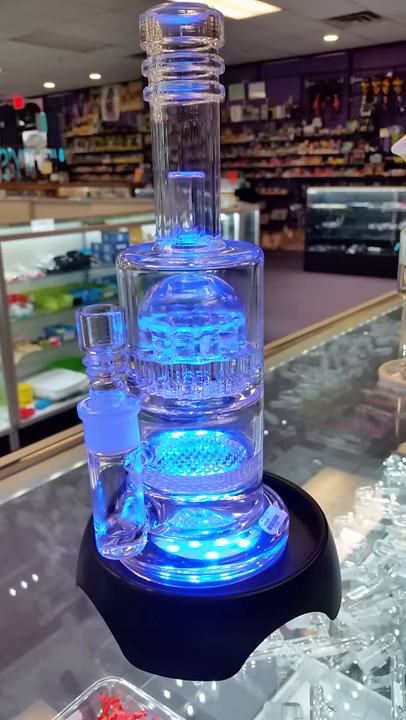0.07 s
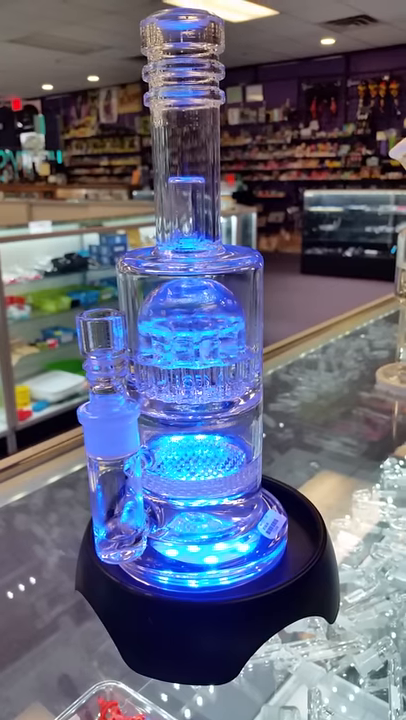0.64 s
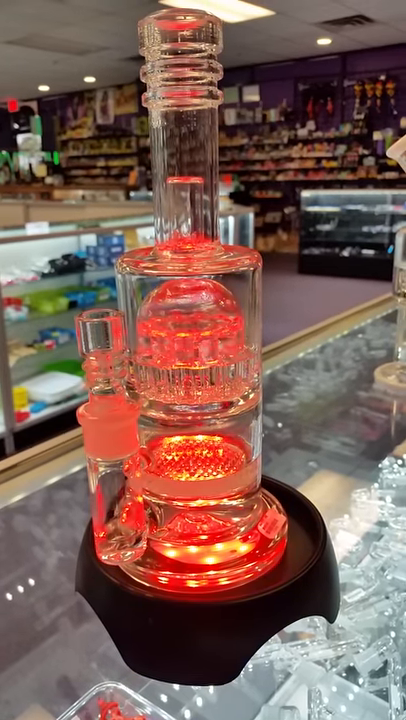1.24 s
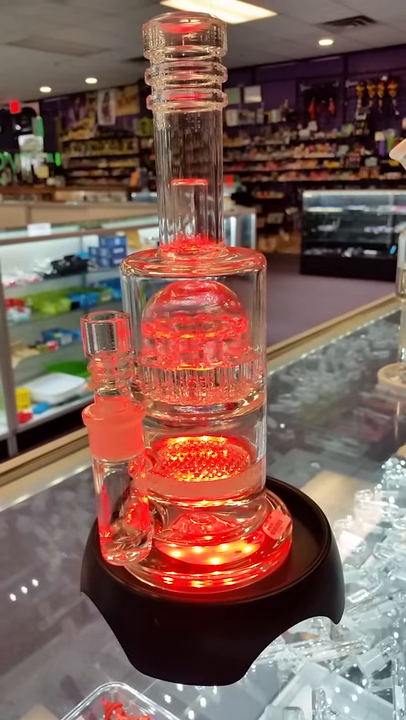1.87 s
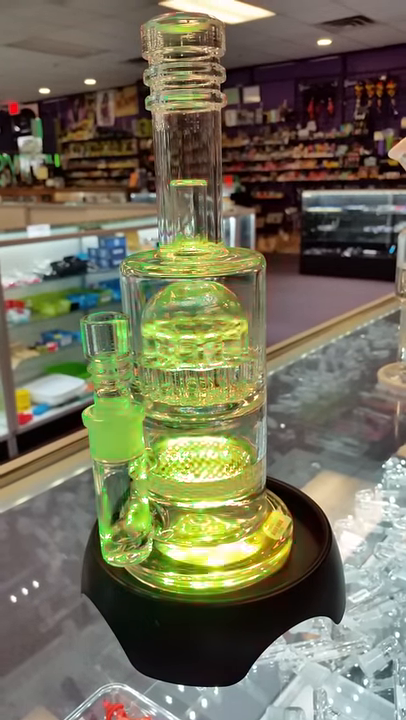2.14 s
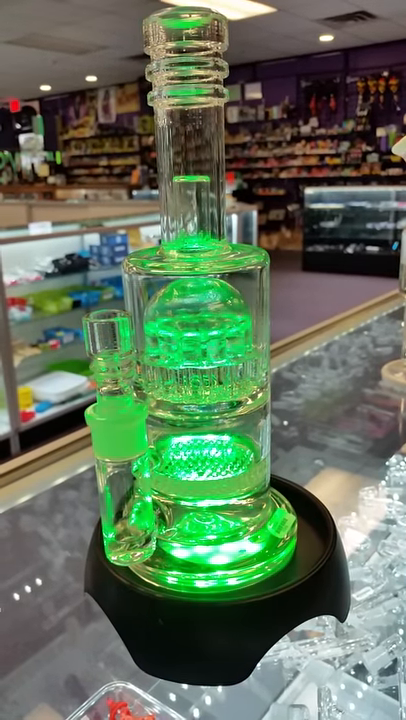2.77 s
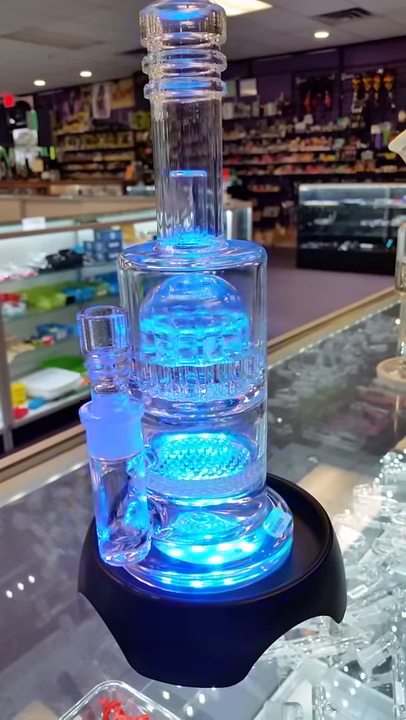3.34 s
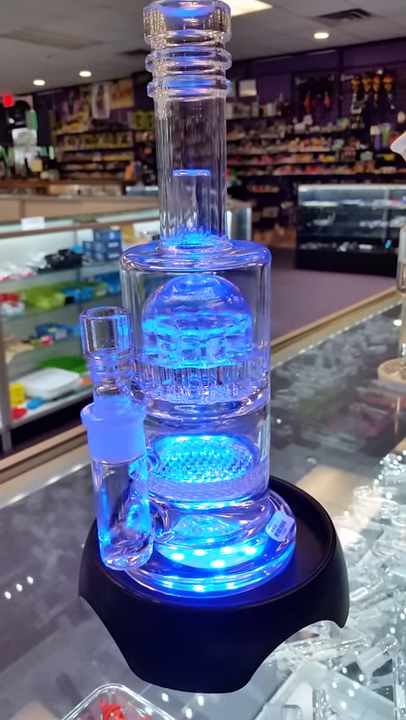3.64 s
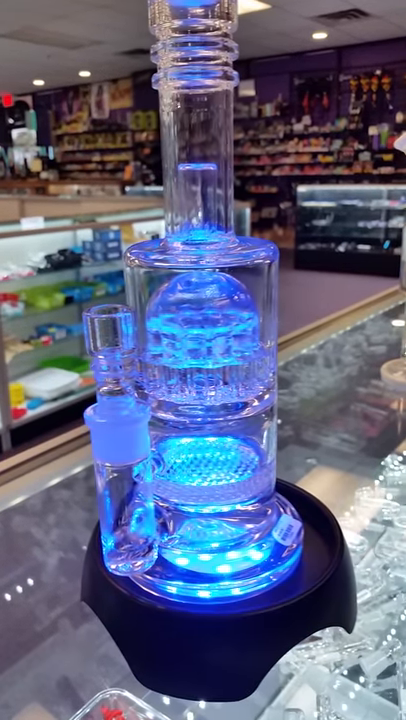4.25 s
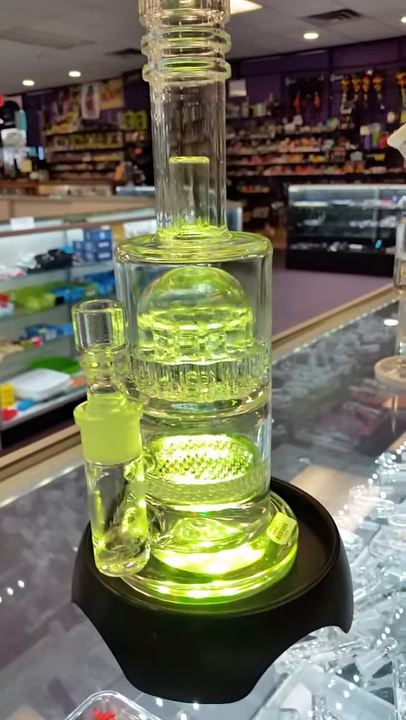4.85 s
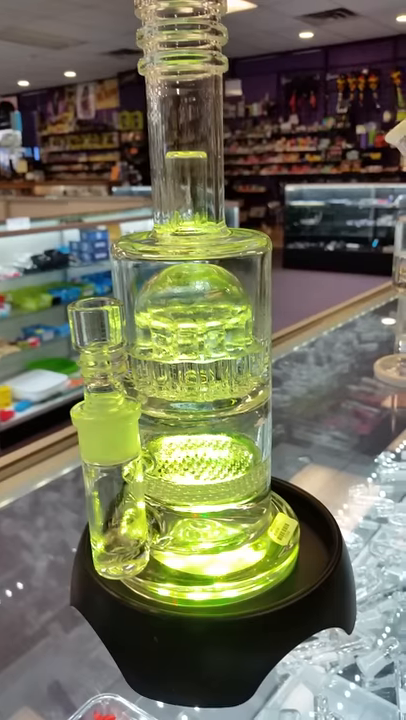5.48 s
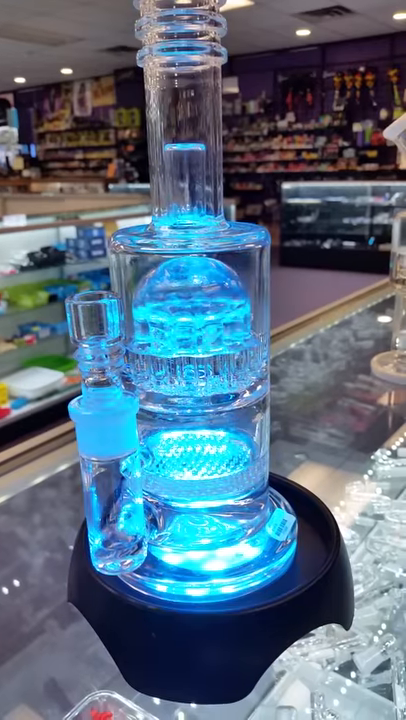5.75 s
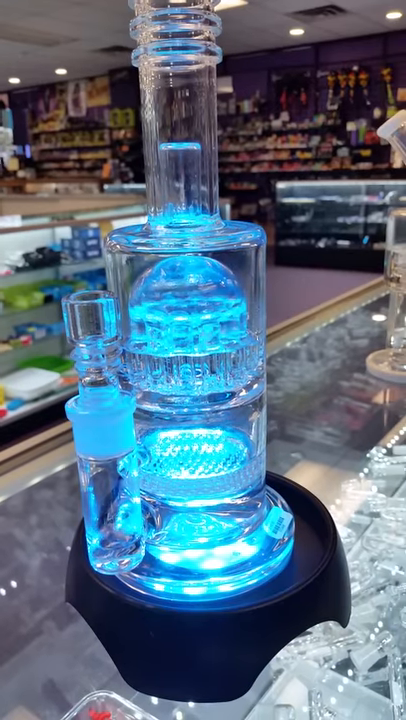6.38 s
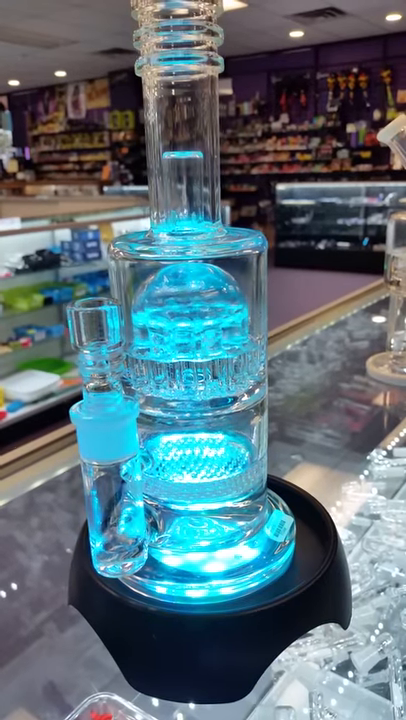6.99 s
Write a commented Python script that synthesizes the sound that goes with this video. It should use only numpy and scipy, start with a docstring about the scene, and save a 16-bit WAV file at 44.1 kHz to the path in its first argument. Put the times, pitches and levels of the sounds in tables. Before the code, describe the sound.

A small display stand motor hums over rumbling shop ventilation, with a few ticks and faint squeaks, while an engine outside swells twice.

```python
"""A shop fades in, close to a display turntable on a glass counter: its mains motor hums and buzzes over
throbbing blowers, rumbling ventilation and faint microphone hiss. From about 1 s the gears tick and the
bearing squeaks now and then, while an engine outside gathers speed. Near 3 s it hits a standing wave of
the shop and booms; it surges again just before 6 s, then eases off under the hum."""
import sys
import numpy as np
from scipy import signal
from scipy.fft import rfft, irfft
from scipy.io import wavfile

SR = 44100
rng = np.random.default_rng(int(sys.argv[2]) if len(sys.argv) > 2 else 0)


def wav_out(sig):
    """Save sig, one row per channel (or a flat mono array), as 16-bit PCM at SR to the path in sys.argv[1]."""
    wavfile.write(sys.argv[1], SR, np.round(np.clip(np.atleast_2d(sig).T, -1, 1) * 32767).astype(np.int16))


N = 318402
TIME = np.arange(N) / SR
FREQ = np.maximum(np.fft.rfftfreq(N, 1 / SR), 1)
MAINS_HZ = 60


def undb(db):
    return 10 ** (np.asarray(db) / 20)


def unit(x):
    """Scale to rms 1."""
    return x / np.sqrt(np.mean(x ** 2))


def read(table, hz):
    """Columns of a spectrum table at the given frequencies."""
    points, *columns = np.transpose(table)
    return np.array([np.interp(np.log(hz), np.log(points), c) for c in columns])


def band(hz, width):
    """Noise in a steep-sided resonance, rms 1."""
    return unit(irfft(rfft(rng.standard_normal(N)) / (1 + (2 * (FREQ - hz) / width) ** 4), N))


def walk(rate_hz):
    """Random drift for modulation, rms 1."""
    return band(0, 2 * rate_hz)


def pan(db):
    """Stereo gains for a pan given as left minus right level."""
    return undb(np.vstack([db, -db]) / 2)


# Level ride on buzz and whines, following the gear load as the platter turns: t/s, level/dB
GEAR_LOAD = [(.5, -0.5), (2, -0.5), (3.2, 1), (4.3, -2), (5.8, 0.5), (7.2, -2)]

def turntable():
    """The foreground: a mains motor drives the platter through gears, on a squeaky bearing."""
    load = undb(np.interp(TIME, *np.transpose(GEAR_LOAD)))
    return motor_hum() + load * (motor_buzz() + motor_whines()) + gear_ticks() + bearing_squeaks()


# Partials that give the motor its body: f/Hz, level/dB, pan/dB
HUM_PARTIALS = [(120.0, -36.0, 0.0), (180.0, -48.5, 3.0), (240.0, -50.0, 0.0), (300.0, -50.5, 1.0),
                (420.0, -57.0, -2.0), (480.0, -62.5, -1.0), (540.0, -63.5, 3.0), (600.0, -61.0, 4.0),
                (652.0, -71.0, 6.0), (900.0, -72.0, 8.0), (930.0, -77.0, 18.0), (990.0, -76.5, -7.0),
                (1050.0, -77.0, 4.0)]

def motor_hum(waver_db=0.77, drift_rad=0.078):
    """Low motor tones; the room's standing waves make them waver as the microphone sways."""
    out = 0
    for hz, db, pan_db in HUM_PARTIALS:
        phase = 2 * np.pi * (hz * TIME + rng.random()) + drift_rad * np.sqrt(hz / MAINS_HZ) * walk(0.83)
        out = out + pan(pan_db) * np.sqrt(2) * np.sin(phase) * undb(db + waver_db * walk(2.4))
    return out


# EQ curve of the motor's upper harmonics: f/Hz, left level/dB, right level/dB
BUZZ_EQ = [(1140.0, -79.0, -85.0), (1400.0, -80.0, -84.0), (1740.0, -72.0, -81.0), (2100.0, -85.0, -90.0),
           (2700.0, -88.0, -91.0), (3100.0, -93.0, -105.0), (3800.0, -90.0, -103.0), (5000, -99, -116),
           (6400.0, -94.0, -114.0), (6900.0, -84.0, -103.0), (8400.0, -113.0, -120.0), (9650, -117, -110),
           (9950.0, -108.0, -92.0), (10500.0, -114.0, -116.0)]

def motor_buzz(from_hz=1090, scatter_db=0.5, half_order_db=-8, trim_db=-3.0, jitter_s=.00003):
    """The rotor rattles the housing once a mains cycle; alternate cycles differ, adding half orders."""
    size = 2 * SR // MAINS_HZ
    order = np.arange(size // 2 + 1)
    hz = np.maximum(order * MAINS_HZ / 2, 1)
    db = read(BUZZ_EQ, hz) + trim_db + half_order_db * (order % 2)
    db += scatter_db * rng.standard_normal((2, len(hz)))
    in_range = (hz > from_hz) * (hz < BUZZ_EQ[-1][0])
    partials = undb(db) * in_range * np.exp(2j * np.pi * rng.random((2, len(hz))))
    loop = irfft(partials, 8 * size) * 8 * size / np.sqrt(2)  # two mains cycles, oversampled 8 times
    position = np.arange(loop.shape[1]) / loop.shape[1]
    return np.array([np.interp((TIME + jitter_s * walk(0.98)) * MAINS_HZ / 2, position, side, period=1)
                     for side in loop])


# Harmonics that the housing picks out of the buzz: f/Hz, relative level/dB
WHINE_PARTIALS = [(1292, -78), (1680, -76.5), (1739, -79.5), (1798, -78.5), (1863, -82.5), (2401, -86),
                  (2643, -87.5), (2702, -81.5), (6541, -87.5), (6659, -93.5), (6842, -89.5), (6901, -86.5),
                  (7009, -85.5), (9959, -94.5)]

def motor_whines(trim_db=-1, waver_db=2.0, drift_rad=0.61):
    """A few harmonics stand out as thin wavering tones, leaning to the same side as the buzz."""
    out = 0
    for hz, db in WHINE_PARTIALS:
        sides = undb(read(BUZZ_EQ, hz))[:, None]
        phase = 2 * np.pi * (hz * TIME + rng.random((2, 1))) + drift_rad * walk(0.94)
        out = out + 2 * unit(sides) * np.sin(phase) * undb(db + trim_db + waver_db * walk(2.0))
    return out


# Early reflections off the counter and display cases, direct sound first: delay t/s, level/dB
GLASS_ECHOES = [(0, 0), (.0007, -5), (.0026, -9), (.0063, -14), (.0088, -11), (.0112, -13)]
# Colour of the plastic housing: f/Hz, left level/dB, right level/dB
HOUSING_EQ = [(350, -1, -1), (900, 1, 1), (1400, -9, -12), (2100, 2, 2), (2550, -1, -6), (2950, -16, -23),
              (3850, -15, -29), (4550, -6, -25), (5500, -14, -28), (6500, -14, -28), (7500, -6, -25),
              (9000, -35, -28), (11000, -37, -26), (15000, -31, -31)]
# Tick cues: t/s, peak level/dB, pan/dB, treble tilt/(dB per octave)
TICK_CUES = [(0.893, -36, 4, -4.5), (2.1692, -24.5, 4, -2), (2.7994, -44, 0.5, 3.5), (3.3738, -44.5, 6, 0),
             (5.0062, -41, 1, 5), (6.086, -41, 7, 1.5)]

def gear_ticks(scatter_db=-25, scatter_s=0.0034, room_db=-35, room_s=0.05):
    """A gear tooth snaps in the housing; nearby glass reflects it and the room answers faintly."""
    out, t = np.zeros((2, N)), TIME[:SR // 4]
    hz = np.maximum(np.fft.rfftfreq(len(t), 1 / SR), 1)
    snaps = sum(undb(db) * signal.unit_impulse(len(t), int(lag * SR)) for lag, db in GLASS_ECHOES)
    tail = undb(scatter_db) * np.exp(-t / scatter_s) + undb(room_db) * np.exp(-t / room_s)
    # folding the cepstrum makes the housing ring only after the snap
    fold = np.sign(len(t) / 2 - np.arange(len(t))) + 1 - (t == 0)
    for start, db, pan_db, tilt_db in TICK_CUES:
        colour = undb(read(HOUSING_EQ, hz) + tilt_db * np.log2(hz / 2000))
        housing = np.exp(rfft(irfft(np.log(colour), len(t)) * fold))
        strike = snaps + rng.standard_normal((2, len(t))) * tail
        tick = irfft(rfft(strike) * housing, len(t))
        i = int(start * SR)
        out[:, i:i + len(t)] += undb(db) * pan(pan_db) * tick / np.abs(tick).max(axis=1, keepdims=True)
    return out


# Squeak cues, scratchier when wider: t/s, length/s, f/Hz, left level/dB, width/Hz
SQUEAK_CUES = [(1.187, 0.022, 6960, -62, 59.3), (2.652, 0.14, 7180, -67, 470),
               (2.817, 0.1, 7000, -56.5, 25), (3.642, 0.07, 2180, -63.5, 440),
               (3.771, .1, 3520, -67, 960.3), (5.118, 0.16, 7120, -73, 160), (6.028, 0.19, 7210, -73, 168)]

def bearing_squeaks(right_db=-17, overtone_db=-24, edge_s=0.0033):
    """The bearing sticks and sings for a moment, close to the left microphone."""
    out = 0
    for start, length, hz, db, width in SQUEAK_CUES:
        gate = np.clip(np.minimum(TIME - start, start + length - TIME) / edge_s, 0, 1)
        phase = np.unwrap(np.angle(signal.hilbert(band(hz, width))))
        overtone = undb(overtone_db) * np.sin(1.5 * phase)  # every second slip differs
        out = out + undb(db) * gate * np.sqrt(2) * (np.sin(phase) + overtone)
    return out * undb([[0], [right_db]])


# Rev curve, pulling away and easing off: t/s, firing f/Hz, relative level/dB at the shop front
ENGINE_REVS = [(0.699, 57, -14.5), (1.852, 67.2, -0.5), (2.4, 93.92, -1.5), (2.7, 99.85, 3),
               (2.95, 105.5, -3), (3.3, 108.5, -4.5), (4.2, 111.9, -7.5), (5.048, 116.3, -12.5),
               (5.799, 123.3, -1), (6.2, 107.5, -20), (6.55, 97, -22), (7.2, 89.7, -17)]

def engine(third_db=-11, roughness=0.11, rough_rad=0.6, rumble_db=-44, roar_db=-48):
    """A firing tone climbs, then sinks, over exhaust noise; its harmonics boom at standing waves."""
    times, *curves = np.transpose(ENGINE_REVS)
    hz, db = (np.interp(TIME, times, c) for c in curves)
    phase = 2 * np.pi * np.cumsum(hz) / SR
    firing = room_boom(hz) * np.sin(phase) * (1 + roughness * walk(28))
    second = room_boom(2 * hz) * np.sin(2 * phase + rough_rad * walk(16))
    third = room_boom(3 * hz) * np.sin(3 * phase + walk(12))
    exhaust = undb(rumble_db) * band(hz=191, width=34) + undb(roar_db) * band(hz=275, width=90)
    return undb(db) * (np.sqrt(2) * (firing + second + undb(third_db) * third) + exhaust)


# Room modes that the engine sweeps through: f/Hz, width/Hz, level/dB
ROOM_MODES = [(97, 6.7, -33.5), (105.83, 5.4, -15.5), (111.27, 3.3, -26.5), (122.2, 3.9, -28.5),
              (190, 26, -38), (208.3, 6, -42)]

def room_boom(hz):
    """Gain of the shop's standing waves for a tone of this pitch."""
    return sum(undb(db) / (1 + (2 * (hz - centre) / width) ** 2) for centre, width, db in ROOM_MODES)


# Bass drones of blowers at nearly the same speed: f/Hz, level/dB, phase wander/rad
BLOWER_DRONES = [(55.75, -49.5, 0.32), (59, -39.5, 0.41), (61.05, -42, 1.2)]

def blowers(wander_hz=2.3, flutter_db=-46, whine_db=-56, halo_db=-54):
    """The blowers beat against each other and throb; their blades whine in a halo of turbulence."""
    def tone(hz, wander_rad):
        return np.sqrt(2) * np.sin(2 * np.pi * (hz * TIME + rng.random()) + wander_rad * walk(wander_hz))
    drone = sum(undb(db) * tone(hz, wander) for hz, db, wander in BLOWER_DRONES)
    drone += undb(flutter_db) * band(hz=60, width=9)
    whine = undb(whine_db) * tone(hz=360, wander_rad=0.27) + undb(halo_db) * band(hz=362, width=11)
    return drone * pan(-1.0) + whine * pan(1.3)


# Narrow rings of the fans and ducts: f/Hz, width/Hz, level/dB
DUCT_RINGS = [(733.4, 20, -70.5), (800, 6.8, -70.5), (826.4, 17, -71), (1221, 22, -73), (1265, 56, -73),
              (1748, 63, -77.5), (2235, 51, -81.5)]

def ducts(swell_db=1.5):
    """The air stream rings narrow resonances that swell and sink at random."""
    out = 0
    for hz, width, db in DUCT_RINGS:
        alike, pan_db = read(STEREO_IMAGE, hz)
        centre = np.sqrt(alike) * band(hz, width)
        sides = np.sqrt(1 - alike) * np.array([band(hz, width), band(hz, width)])
        out = out + undb(db + swell_db * walk(0.93)) * pan(pan_db) * (centre + sides)
    return out


# Low bed of ventilation and room air, as noise density: f/Hz, level/dB
AIR_BED = [(20.0, -76.5), (40.0, -67.7), (80.0, -69.8), (150.0, -63.5), (210.0, -65.2), (280.0, -70.5),
           (400.0, -80.9), (600.0, -85.8), (850.0, -86.7), (1100.0, -91.4), (1750.0, -95.0),
           (2400.0, -100.8), (3100.0, -106.3)]
# High bed of gear whir and microphone hiss, as noise density: f/Hz, left level/dB, right level/dB
HISS_BED = [(3230, -104.3, -110.1), (4760, -102.2, -115.8), (5500, -108.2, -121.7), (6300, -104.7, -119.0),
            (7530, -100.4, -116.6), (7730, -105.3, -119.2), (8330, -117.9, -125.1), (9040, -125.6, -124.8),
            (9840, -120.3, -113.1), (10800, -122.4, -117.7), (12500, -114.6, -114.0),
            (15000, -105.2, -108.6), (15700, -107.6, -112.2)]

def room_air(crossover_hz=3200, swell_db=-0.2):
    """Broad rush of the ventilation below the crossover, fine whir and hiss above."""
    low = FREQ < crossover_hz
    balance = pan(read(STEREO_IMAGE, FREQ)[1])
    rush = diffuse(undb(read(AIR_BED, FREQ)) * balance * low) * undb(swell_db * walk(3.5))
    return rush + diffuse(undb(read(HISS_BED, FREQ)) * ~low)


# Stereo image of the room tone: f/Hz, correlation (0-1), pan/dB
STEREO_IMAGE = [(30, .95, -.5), (120, .95, .3), (300, .9, 1.8), (600, .56, 2.8), (1200, .05, 3),
                (2000, .03, 3.8), (3200, .02, 4.8)]

def diffuse(gain):
    """Stereo noise of the given spectra: centred in the bass, wide in the treble."""
    mid, side = rfft(rng.standard_normal((2, N)))
    alike = read(STEREO_IMAGE, FREQ)[0]
    mid, side = mid * np.sqrt(1 + alike), side * np.sqrt(1 - alike)
    return irfft(np.array([mid + side, mid - side]) * gain, N) * np.sqrt(SR) / 2


def scene():
    """The stereo mix: turntable up front, ventilation around it, engine outside."""
    return turntable() + room_air() + ducts() + blowers() + engine()


# Bass phase lead of the left microphone over the right: f/Hz, lead/rad
MIC_LEAD = [(35, .18), (60, .25), (110, .32), (200, .27), (320, .2), (600, 0)]

def record(dry, start_s=0.37, rise_s=0.28, top_hz=15750):
    """Two microphones differ in phase; the sound fades in from near silence, with the top cut."""
    lead = read(MIC_LEAD, FREQ) * np.array([[.5], [-.5]])
    heard = irfft(rfft(dry) * np.exp(1j * lead), N)
    fade = np.clip((TIME - start_s) / rise_s, 0, 1) + undb(-61) * np.clip(TIME / start_s, 0, 1) ** 2
    high_cut = signal.ellip(10, .2, 80, top_hz, fs=SR, output="sos")
    return signal.sosfilt(high_cut, heard * fade)


dry = scene()
out = record(dry)
wav_out(out)
```